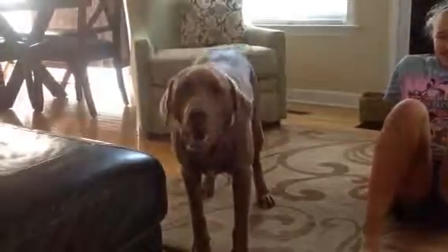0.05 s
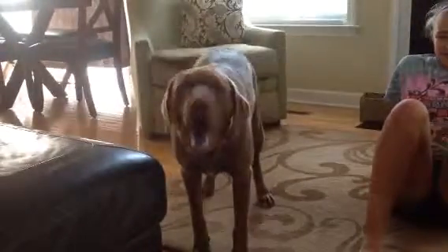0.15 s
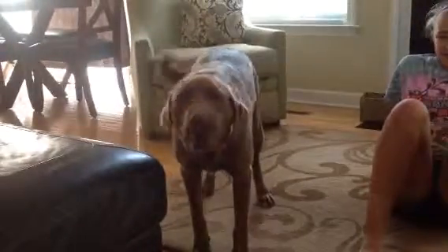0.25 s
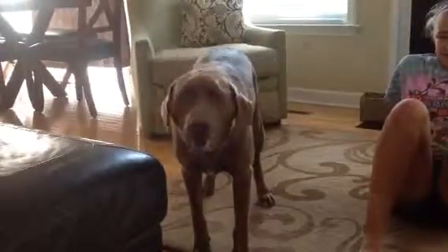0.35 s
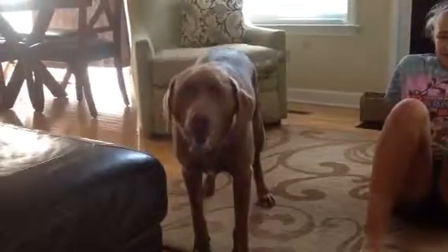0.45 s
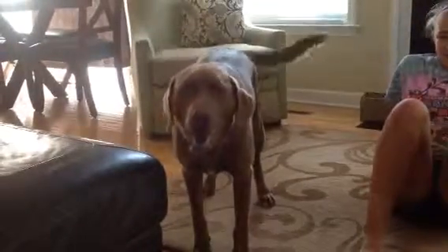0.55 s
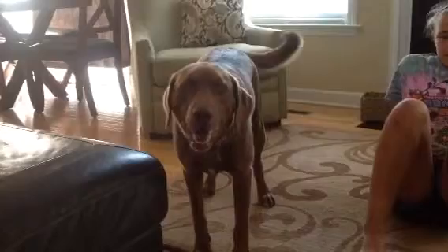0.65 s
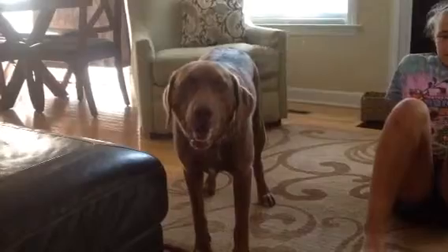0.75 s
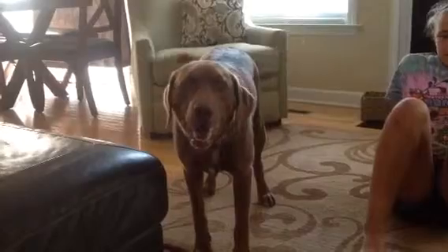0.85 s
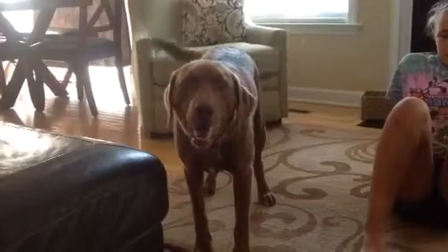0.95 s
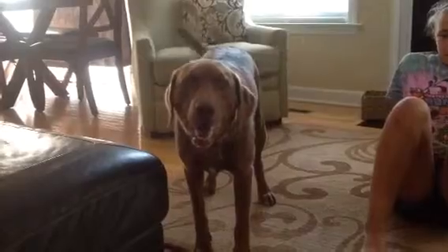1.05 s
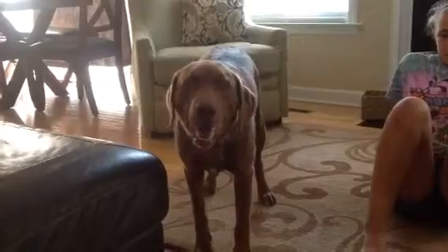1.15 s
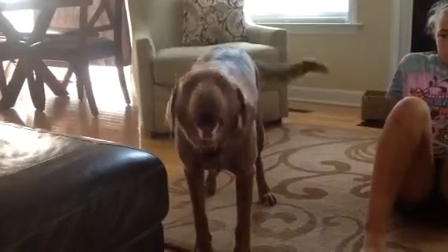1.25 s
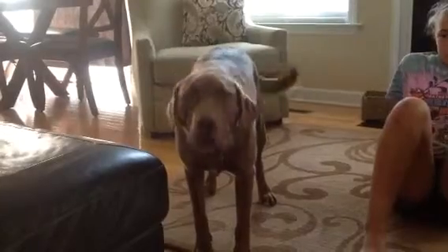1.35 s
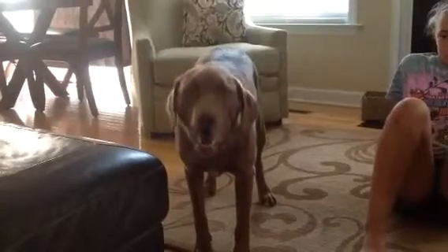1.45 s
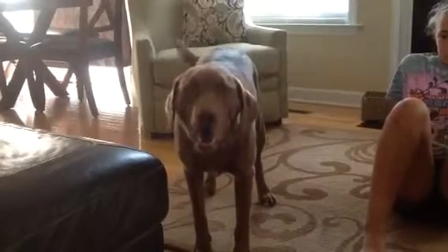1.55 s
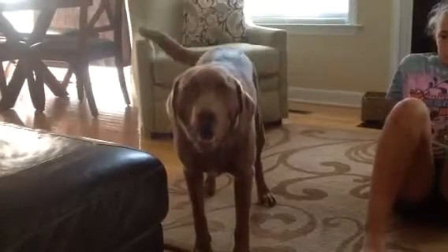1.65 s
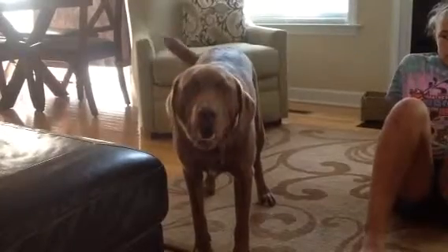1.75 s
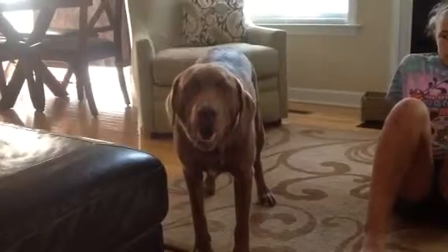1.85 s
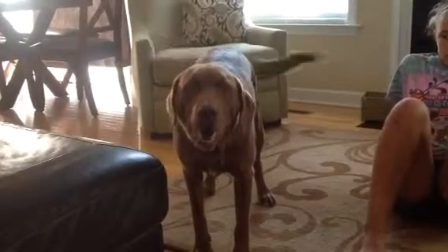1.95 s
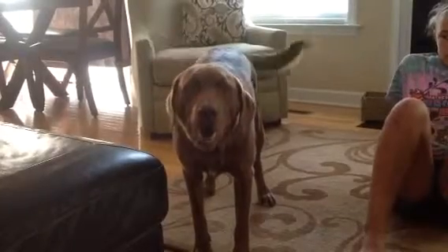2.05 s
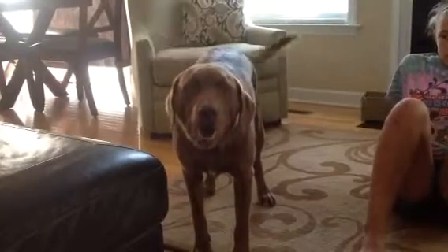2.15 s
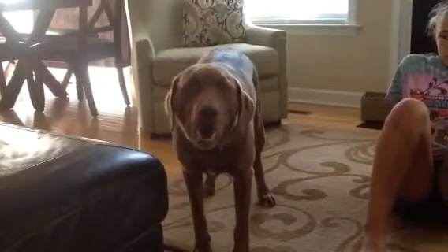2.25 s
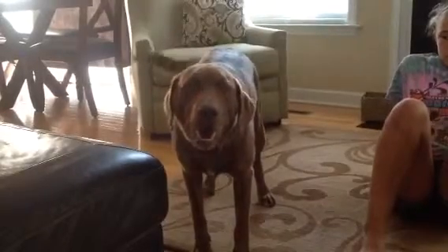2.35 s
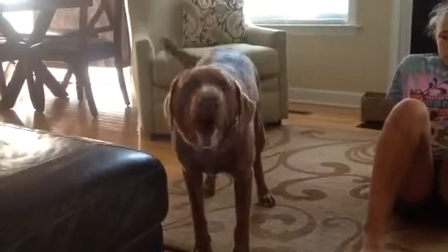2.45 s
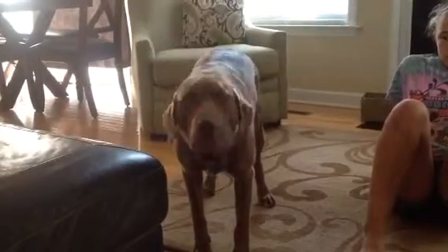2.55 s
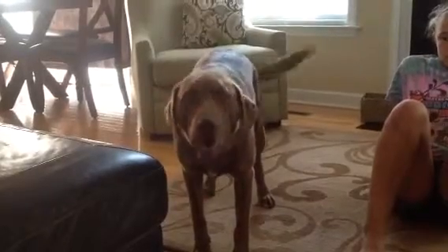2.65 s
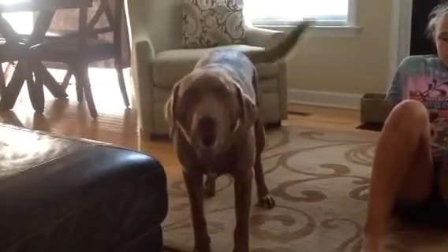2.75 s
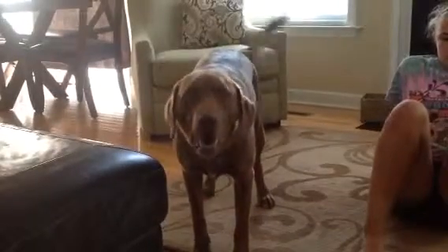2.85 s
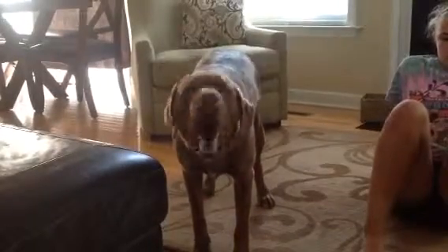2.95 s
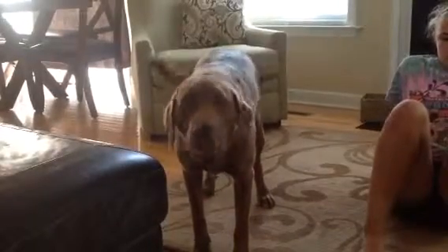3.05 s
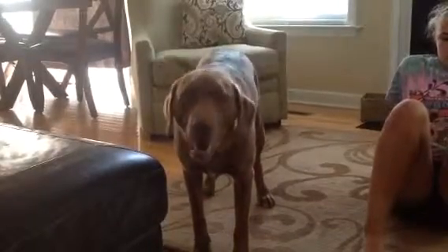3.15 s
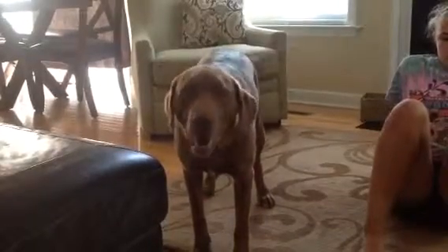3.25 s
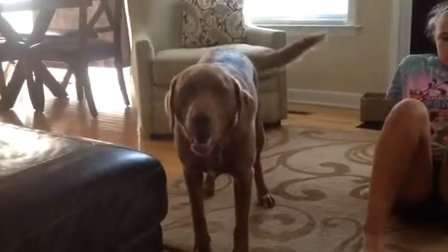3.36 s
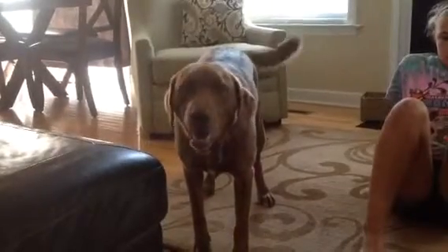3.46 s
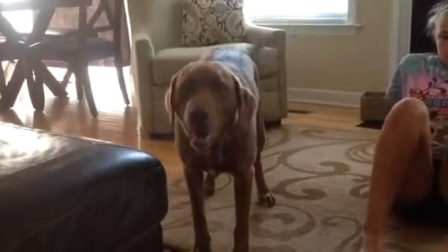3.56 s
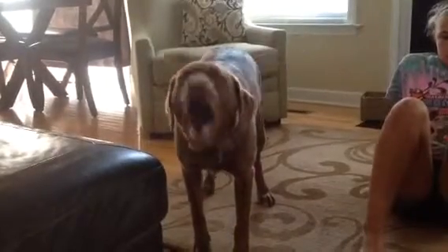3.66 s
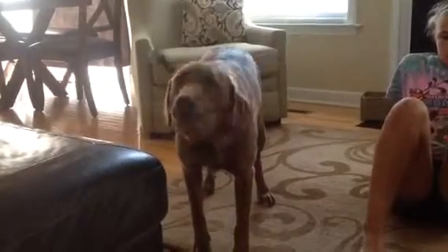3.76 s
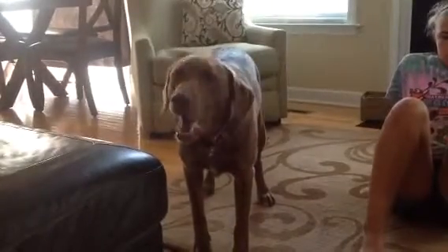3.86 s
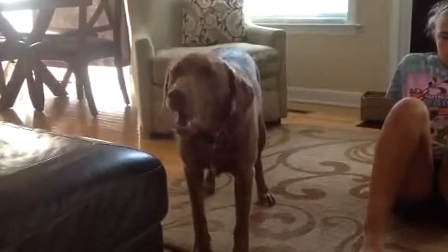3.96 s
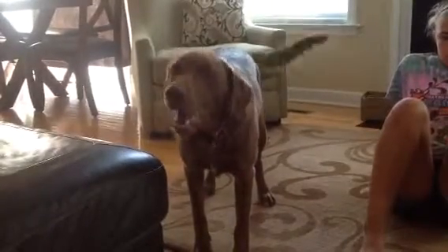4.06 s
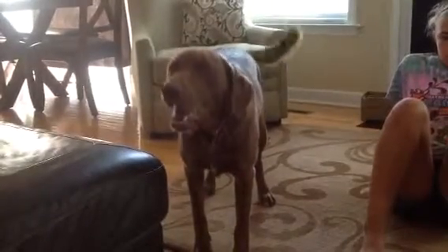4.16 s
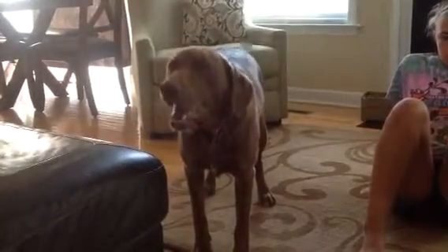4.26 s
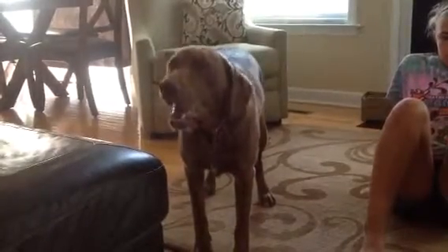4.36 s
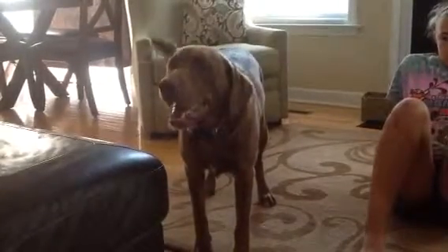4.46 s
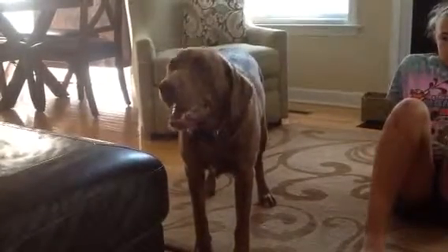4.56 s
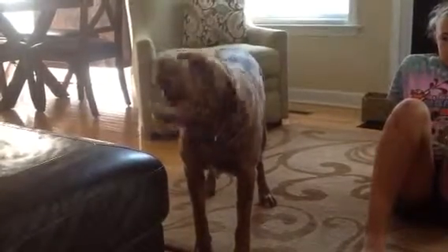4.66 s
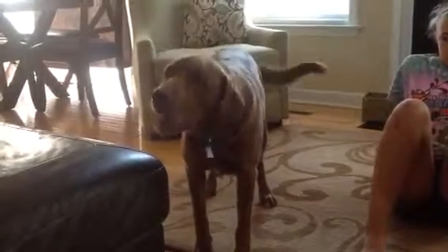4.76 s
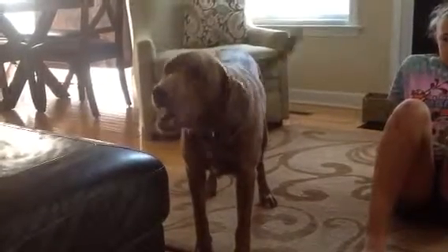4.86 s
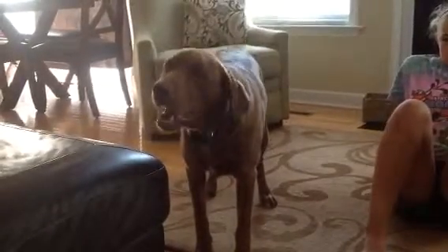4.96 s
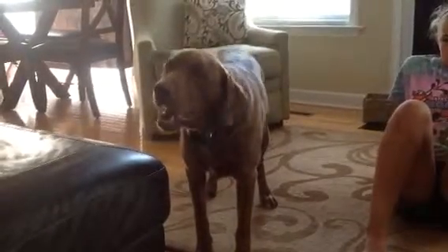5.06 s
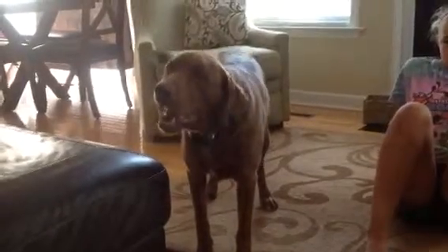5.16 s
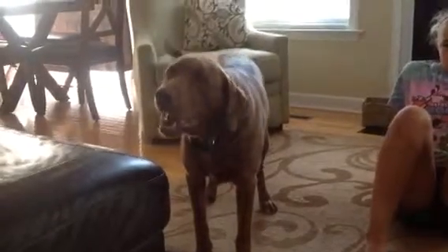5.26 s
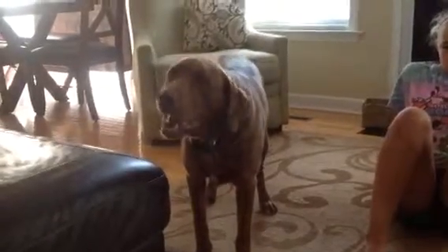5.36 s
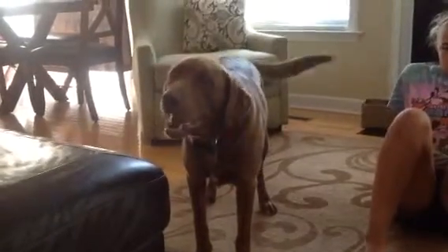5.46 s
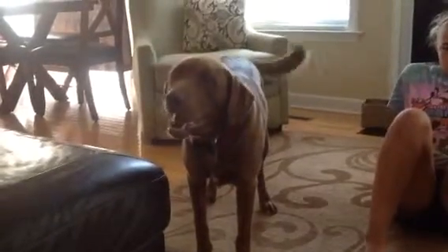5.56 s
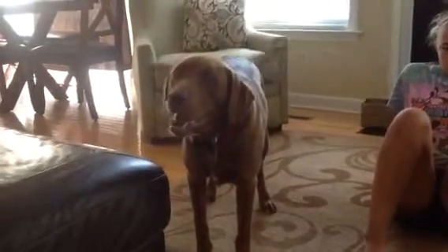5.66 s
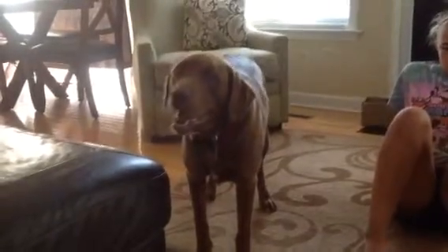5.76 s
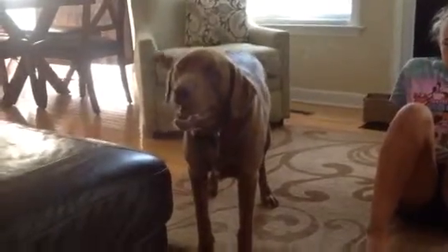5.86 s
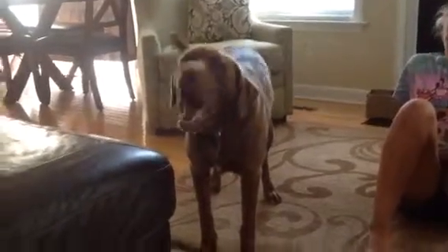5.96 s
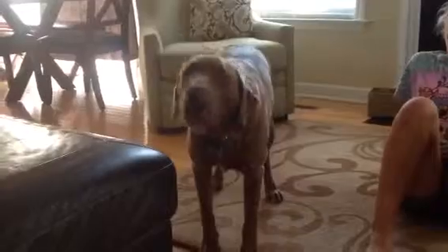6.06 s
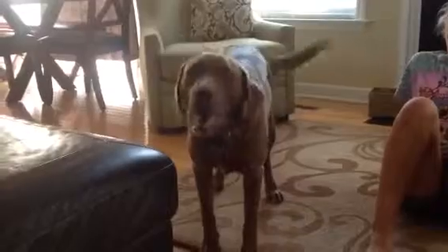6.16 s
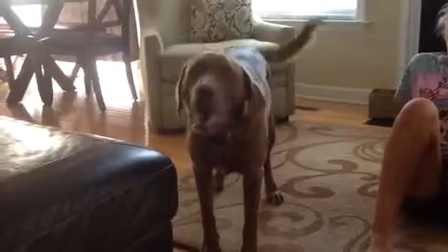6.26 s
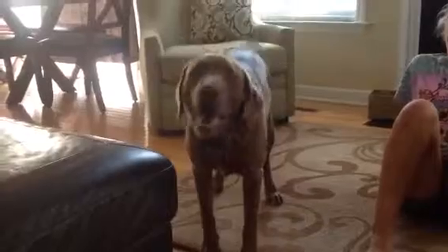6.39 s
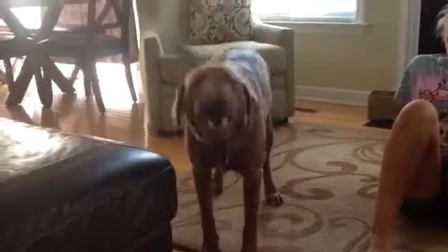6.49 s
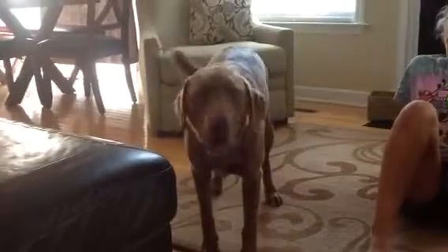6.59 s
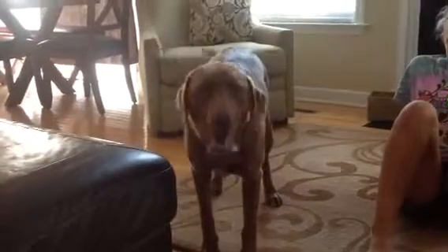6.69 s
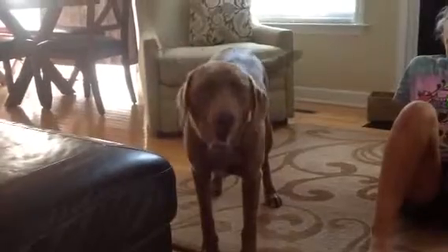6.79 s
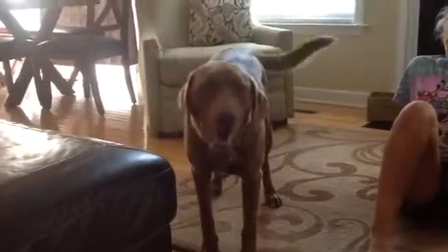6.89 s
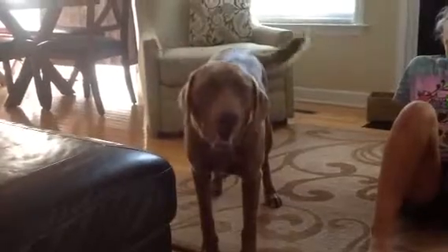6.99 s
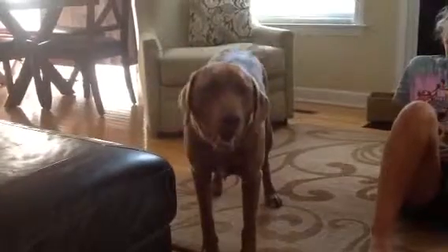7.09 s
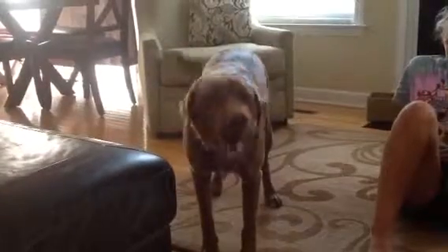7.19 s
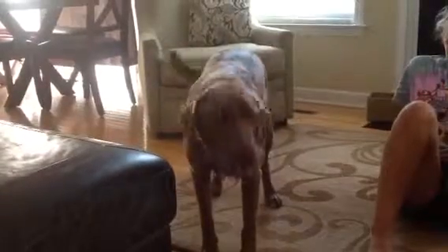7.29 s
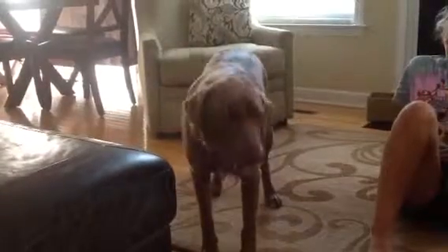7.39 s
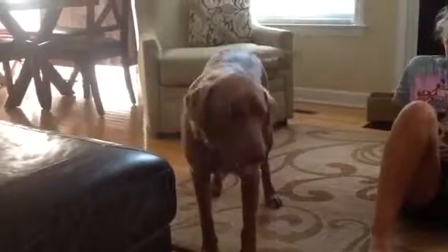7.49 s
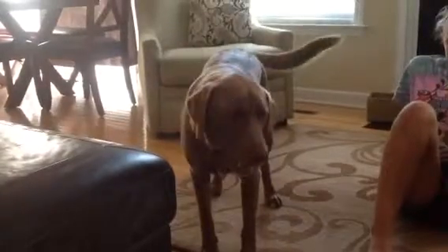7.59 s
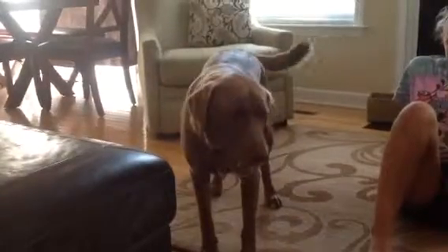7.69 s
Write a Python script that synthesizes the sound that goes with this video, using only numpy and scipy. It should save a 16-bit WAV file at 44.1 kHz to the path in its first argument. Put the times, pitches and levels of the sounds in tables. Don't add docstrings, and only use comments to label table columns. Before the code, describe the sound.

The room is still ringing from a bark just before the start. A large dog then barks loudly at about 0.2 and 1.2 seconds, with soft pants and a tiny high nose whistle between. Around 1.8 and 2.1 it gives two short, low, pulsing grumbles mixed with breaths. A strong bark at 2.5 is followed quickly by another at 3.0, then singles at 3.7 and 4.6. From 4.9 to 5.7 collar tags clink and scrape brightly over light panting. Barks return at 6.0, 6.5 and 7.2, with more tag jingles until the end near 7.7. Each bark lasts under a fifth of a second, arching up to around 415 hertz, hoarse and open-throated, with a puff of air at its onset. Hard living-room reflections ring on, held loud by a close phone microphone's limiter, over faint hum and hiss.

```python
import sys
import numpy as np
from scipy import signal
from scipy.fft import rfft, irfft
from scipy.io import wavfile
from scipy.ndimage import uniform_filter1d

SR = 44100
rng = np.random.default_rng(int(sys.argv[2]) if len(sys.argv) > 2 else 0)


def digitize_waveform(pressure):
    field = np.atleast_2d(pressure).T
    bounded = np.clip(field, -1, 1)
    quanta = np.round(bounded * 32767).astype(np.int16)
    wavfile.write(sys.argv[1], SR, quanta)


def field_ratio(decibels):
    return 10 ** (np.asarray(decibels, dtype=float) / 20)


N = 340893
LEAD = 22050

# frequency in Hz, gain in dB.
THROAT = [(100, -29.5), (250, -15), (410, -7), (600, -1.5), (830, 0), (1000, -5), (1230, -3.5),
          (1450, -11.5), (1680, 0), (2050, -10), (2380, -16), (2600, -45), (3100, -25), (4000, -51)]


def evened(x):
    return x / np.sqrt(np.mean(x ** 2) + 1e-20)


def read(points, hz):
    f, value = np.transpose(points)
    return np.interp(np.log(hz + 1), np.log(f + 1), value)


def coloured(x, points):
    hz = np.fft.rfftfreq(len(x), 1 / SR)
    return evened(irfft(rfft(x) * field_ratio(read(points, hz)), len(x)))


def wander(count, smooth):
    return evened(uniform_filter1d(rng.standard_normal(count), smooth))


def resonate(x, hz, width):
    turn = np.exp(2j * np.pi * np.cumsum(hz * np.ones(len(x))) / SR)
    r = np.exp(-np.pi * width / SR)
    low = signal.lfilter([1 - r], [1, -r], x / turn)
    low = signal.lfilter([1 - r], [1, -r], low)
    return 2 * (turn * low).real


def add(mix, s, sound):
    part = mix[round(s * SR) + LEAD:][:len(sound)]
    part += sound[:len(part)]


def floor():
    # frequency in Hz, level in dB per Hz.
    hum_and_hiss = [(40, -43), (100, -18), (170, -8.5), (240, -12), (350, -9.5), (700, -27), (2100, -22),
                    (3000, -26.5), (4800, -28), (8000, -35), (16000, -41.5)]
    level_db, patch_db = -53.5, 2.2
    frames = (N + LEAD) // 256 + 5
    hz = np.fft.rfftfreq(1024, 1 / SR)
    a, b, patches = rng.standard_normal((frames, 513, 3)).T
    patches = uniform_filter1d(patches, 10, 0)
    patches = evened(uniform_filter1d(patches, 12, 1))
    z = (a + 1j * b) * field_ratio(read(hum_and_hiss, hz)[:, None] + patch_db * patches)
    noise = signal.istft(z, nperseg=1024, noverlap=768)[1]
    return field_ratio(level_db) * evened(noise[:N + LEAD])


def room_tail(taps):
    # frequency in Hz, time to fall by 60 dB in seconds.
    ring_time = [(100, 0.057), (250, 0.51), (530, 0.56), (1400, 0.65), (2700, 0.54), (4800, 0.56),
                 (8000, 0.39), (11000, 0.4), (16000, 0.45)]
    far_db, far_slower = -26.5, 1.986
    thicken_s = .013
    hz, t, z = signal.stft(taps, SR, nperseg=256)
    fall_db = -60 * t / read(ring_time, hz)[:, None]
    fall = field_ratio(fall_db) + field_ratio(far_db + fall_db / far_slower)
    tail = signal.istft(z * fall, SR, nperseg=256)[1]
    tail = tail * (1 - np.exp(-(np.arange(len(tail)) / SR / thicken_s) ** 2))
    return tail / np.linalg.norm(tail)


def in_room(x, wet_db):
    size = int(1.4 * SR)
    taps = rng.choice([-1., 1.], size) * (rng.random(size) < .06)
    out = field_ratio(wet_db) * signal.fftconvolve(x, room_tail(taps))
    out[:len(x)] += x
    return out


def rattle(db):
    # mode in Hz, level in dB, time to fall by 60 dB in seconds.
    ring_modes = [(4480, -9, 0.43), (5020, -2, 0.43), (6490, -1, 0.31), (6920, 0, 0.23), (8000, -6, 0.16),
                  (9830, -6, .12)]
    t = np.arange(SR // 3) / SR
    noise = rng.standard_normal(len(t))
    ring = 0
    for hz, mode_db, t60 in ring_modes:
        ring = ring + field_ratio(mode_db - 60 * t / t60) * evened(resonate(noise, hz, 220))
    tick = resonate(noise, 8500, 5000) * field_ratio(4.0 - 60 * t / .03)
    return field_ratio(db) * (ring + tick) * np.minimum(t / .001, 1)


def clink(db, middle_db, top_db, tick_db):
    # mode in Hz, time to fall by 60 dB in seconds, wobble in radians.
    tag_modes = [(4030, 0.23, .1), (5000, .2, .1), (6650, 0.54, 0.022), (9453, 0.31, 1),
                 (10000, 0.13, 0.95), (12040, 0.15, 0.13), (12200, .1, 0.31)]
    t = np.arange(SR // 2) / SR
    levels = [-22, -26, 0, middle_db, middle_db - 0.5, top_db, top_db - 1.5]
    swing = field_ratio(1.6 * wander(len(t), 500))
    rub = wander(len(t), 120)
    ring = 0
    for mode_db, (hz, t60, wobble) in zip(levels, tag_modes):
        ring = ring + field_ratio(mode_db - 60 * t / t60) * np.sin(2 * np.pi * hz * t + wobble * rub)
    tick = resonate(rng.standard_normal(len(t)), 8000, 4000) * field_ratio(tick_db - 60 * t / 0.044)
    return field_ratio(db) * (ring * swing + tick) * np.minimum(t / .0012, 1)


def sniff(length, from_hz, to_hz, db):
    hz = np.linspace(from_hz, to_hz, int(length * SR))
    return field_ratio(db) * np.sin(2 * np.pi * np.cumsum(hz) / SR) * np.hanning(len(hz))


def pant(db, length):
    # frequency in Hz, level in dB per Hz.
    breath = [(400, -8), (800, 1.5), (1150, -4), (1700, 0), (2400, 0.5), (3000, -18), (5000, -26),
              (9000, -25), (16000, -49)]
    air = rng.standard_normal(SR // 4)[:int(length * SR)]
    swell = np.sin(np.pi * np.linspace(0, 1, len(air)) ** 0.68) ** 2
    return field_ratio(db) * coloured(air, breath) * swell


def cycles(hz, jitter):
    return np.cumsum(hz * (1 + jitter * wander(len(hz), 150))) / SR


def tract(x, modes):
    return sum((-1) ** k * field_ratio(db) * resonate(x, f, w) for k, (f, w, db) in enumerate(modes))


def grumble(length, db, pulses_hz, muzzle_db):
    # resonance in Hz, width in Hz, level in dB.
    chest = [(196, 200, -16.5), (374, 136, 1), (591, 98, 2)]
    muzzle = [(1086, 110, 5), (1614, 200, 2.5), (2160, 120, -7), (2900, 200, -5)]
    rise_s, swell_db, fade_db = .012, 15, -30
    pitch_sag, muzzle_opens_db = 0.027, -24.5
    t = np.arange(0, length, 1 / SR)
    share = t / length
    turns = cycles(pulses_hz * (1 - pitch_sag * (2 * share - .8) ** 2), jitter=0.048)
    folds = evened(sum(np.cos(2 * np.pi * k * turns) for k in range(1, 40)))
    air = np.exp(-(turns % 1) / 0.84) * rng.standard_normal(len(t))
    upper_db = muzzle_db + muzzle_opens_db * (1 - share)
    voice = evened(tract(folds + 0.66 * air, chest))
    voice = voice + field_ratio(upper_db) * evened(tract(folds + 2.4 * air, muzzle))
    effort_db = db + swell_db * (share - .5) + fade_db * share ** 4.0
    edges = np.minimum(t / rise_s, 1) * signal.windows.tukey(len(t), .1)
    return field_ratio(effort_db) * edges * voice


def throat(hz):
    grid = np.fft.fftfreq(4096, 1 / SR)
    lag = -signal.hilbert(np.log(field_ratio(read(THROAT, abs(grid))))).imag
    return field_ratio(read(THROAT, hz)), np.interp(hz, grid[:2048], lag[:2048])


def bark(db, top_hz, beat, slack):
    # frequency in Hz, level in dB per Hz.
    rasp = [(300, 1), (800, -3), (1700, 9), (2380, 1.5), (2550, -13), (2800, -16), (3050, -14.5),
            (4000, -10.5), (4900, 4.5), (5800, -7), (7000, -5), (9500, -11.5), (13000, -19.5),
            (16000, -24.5)]
    length = .135 + .055 * slack
    top_at, climb, climb_bend = .52, .49, 1.15
    hold_to, sag, sag_bend = .68, .26, 1.2
    climb_db, sag_db = 25.5, 43
    catch_at, catch_in, catch_db = .025, .035, -18
    shut_from, shut_db, shut_mouth = 0.777, -3, 0.22
    rasp_db, loose = -17, 1.27

    noise = rng.standard_normal(SR // 4)
    share = np.arange(int(length * SR)) / (length * SR)
    below = climb * (1 - np.sin(np.pi / 2 * np.minimum(share / top_at, 1)) ** climb_bend)
    past = sag * np.maximum((share - hold_to) / (1 - hold_to), 0) ** sag_bend
    shut = np.maximum((share - shut_from) / (1 - shut_from), 0)
    effort_db = catch_db * np.clip(1 - (share - catch_at) / catch_in, 0, 1)
    effort_db = effort_db - climb_db * below - sag_db * past + shut_db * shut
    onset = np.minimum(share / .05, 1)
    hz = top_hz * (1 - below - past) * (1 - slack * np.exp(-share / .1))
    turns = cycles(hz, jitter=0.0054 + .09 * below)

    order = np.arange(1, 36)[:, None] / 2
    gain, lag = throat(order * hz / (1 - shut_mouth * shut))
    gain = gain * np.where(order % 1, beat * field_ratio(0.51 * effort_db), 1)
    voice = (gain * np.cos(2 * np.pi * order * (turns + 1.3) + lag - .9)).sum(0)

    air = (.25 + np.exp(-(turns % 1) / .2)) * noise[:len(share)]
    breathy = loose * below * coloured(air[::-1], THROAT)
    hiss = field_ratio(rasp_db + 0.5 * effort_db + 2.9 * share) * coloured(air, rasp)
    return field_ratio(db + effort_db) * (evened(voice) + breathy + hiss) * onset


def scene():
    # start in seconds, peak in dB.
    rattles = [
        (5.445, -59.5),
        (5.467, -55.5),
        (5.621, -56.5),
        (5.643, -51),
    ]
    # start in seconds, peak in dB, middle mode in dB, top mode in dB, tick in dB.
    clinks = [(0.03, -45, -18, -24.5, -27), (1.6721, -54, -5, -23, -22), (1.8662, -60, -5, -19, -20),
              (2.8484, -45, -18, -20, -11), (3.5478, -59.5, -14.5, -18, -20), (3.989, -46.5, -2, -20, -32),
              (4.3455, -58, -6, -15, 5), (4.6009, -50, -22.5, -28, -20), (4.9113, -34, -4, 8, -20),
              (4.9237, -22.5, -20, -10, -20), (5.2036, -29, -17, -7.5, -15), (5.9309, -72, -15, -15, -20),
              (6.4298, -47, -19, -28, -23), (6.8438, -32, -8, -6, -20), (6.9043, -27, -27, -17, -22),
              (7.1486, -43, -6, 2, -25), (7.5113, -38, -21, -9, -20), (7.5209, -39, 2.5, -17.5, -20),
              (7.657, -51, -5, -21, -20)]
    # start in seconds, length in seconds, from Hz, to Hz, level in dB.
    whistle = (.79, .09, 4850, 4100, -54)
    # start in seconds, level in dB, length in seconds.
    pants = [(0.948, -45, 0.012), (5.308, -52, 0.23), (5.249, -38, 0.024), (0.919, -43, 0.13),
             (1.082, -50.5, 0.19), (1.795, -38, 0.076), (2.038, -42, 0.26), (2.191, -33.5, 0.098),
             (2.458, -51, 0.017), (4.358, -41, 0.06), (4.514, -48, 0.13), (5.939, -45.5, 0.038)]
    # start in seconds, length in seconds, level in dB, pulses in Hz, muzzle at the end in dB.
    grumbles = [
        (1.76, 0.084, -33, 92.4, 4),
        (2.093, .175, -27, 88.04, 2.5),
    ]
    # onset in seconds, effort in dB, top pitch in Hz, share of every-other-pulse beat,
    # slackness of the first pulses from 0 to 1.
    barks = [
        (-.26, 9, 415.6, 0.35, 0),
        (.2, 9, 407.3, 0.22, 0.02),
        (1.238, 9.5, 423.9, 0.28, 0.13),
        (2.485, 10.5, 422.6, 0.23, 0),
        (2.968, 9.5, 415.9, 0.25, 0.04),
        (3.669, 9.5, 419.8, .23, 0.12),
        (4.64, 10, 419.2, 0.34, .1),
        (5.969, 8, 420.1, 0.32, 0.45),
        (6.467, 8, 410.3, 0.16, 0.08),
        (7.183, 8.5, 412.2, 0.27, 0),
    ]
    mix, small, tags = floor(), np.zeros(N + LEAD), np.zeros(N + LEAD)
    for s, db in rattles:
        add(tags, s, rattle(db))
    for s, *row in clinks:
        add(tags, s, clink(*row))
    add(small, whistle[0], sniff(*whistle[1:]))
    for s, *row in pants:
        add(small, s, pant(*row))
    for s, *row in grumbles:
        add(small, s, grumble(*row))
    for s, *row in barks:
        add(small, s - .016, pant(-24.5, 0.15))
        add(mix, s, in_room(bark(*row), wet_db=-4.0))
    mix += in_room(small, wet_db=-8)[:len(mix)]
    mix += in_room(tags, wet_db=-8.5)[:len(mix)]
    return mix[None, LEAD:]


def roll_off(x):
    return signal.sosfilt(signal.butter(12, 16290, fs=SR, output="sos"), x)


def record(dry):
    bass_cut = signal.butter(2, 110, "high", fs=SR, output="sos")
    x = signal.sosfilt(bass_cut, np.pad(dry, ((0, 0), (LEAD, 0)), "reflect"))

    look_ahead = 10
    peak_db = 20 * np.log10(abs(x[0]) + 1e-9)
    fall = np.arange(N + LEAD) * 250.0 / SR
    held_db = np.maximum.accumulate(peak_db + fall) - fall
    over_db = np.maximum(held_db + 7.0, 0)
    grab = np.exp(-1 / (.00035 * SR))
    cut_db = 0.73 * signal.lfilter([1 - grab], [1, -grab], np.roll(over_db, -look_ahead))
    x = x / field_ratio(cut_db)

    knee, top = .6, .81
    bent = knee + (top - knee) * np.tanh((abs(x) - knee) / (top - knee))
    x = np.where(abs(x) > knee, np.sign(x) * bent, x)

    band_edge = signal.firwin(511, 15400, window=("kaiser", 9), fs=SR)
    x = signal.oaconvolve(x, band_edge[None], "same")[:, LEAD:]
    x = x * np.minimum(np.arange(N) / 40, 1)
    return roll_off(x)


dry = scene()
out = record(dry)
digitize_waveform(out)
```